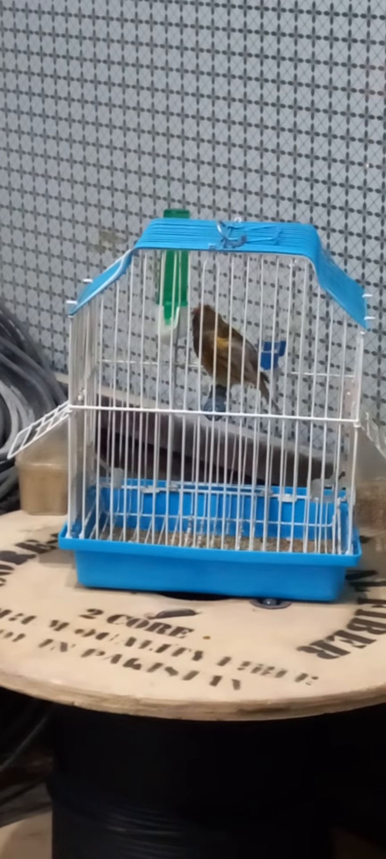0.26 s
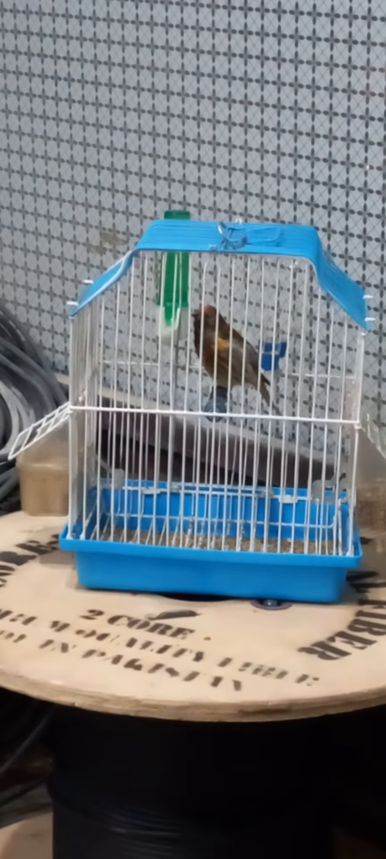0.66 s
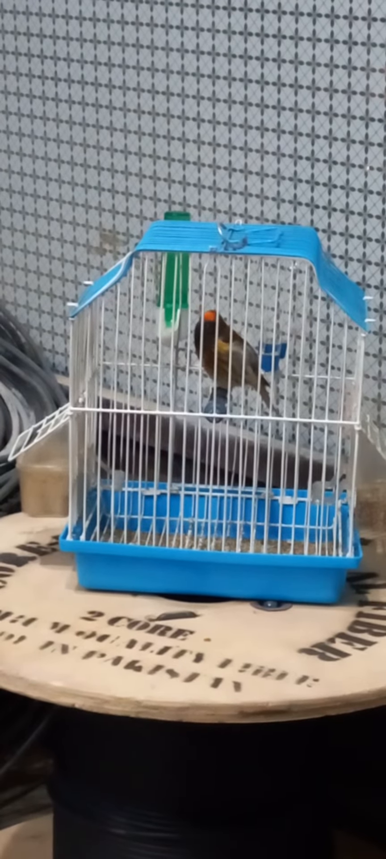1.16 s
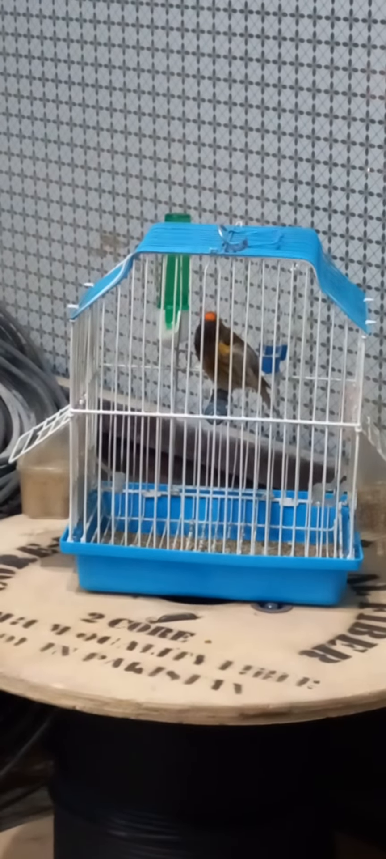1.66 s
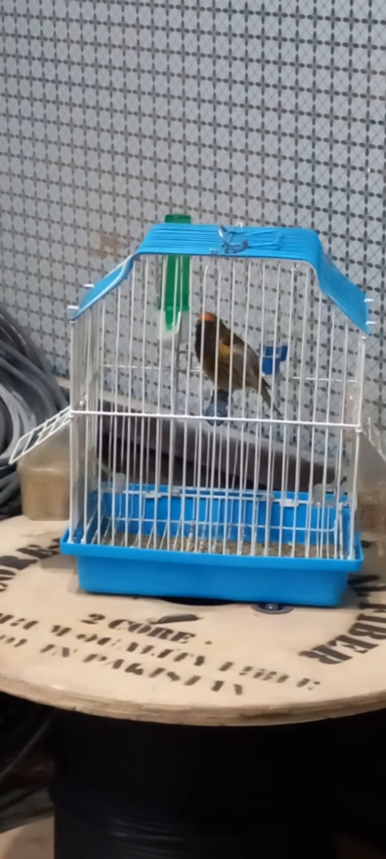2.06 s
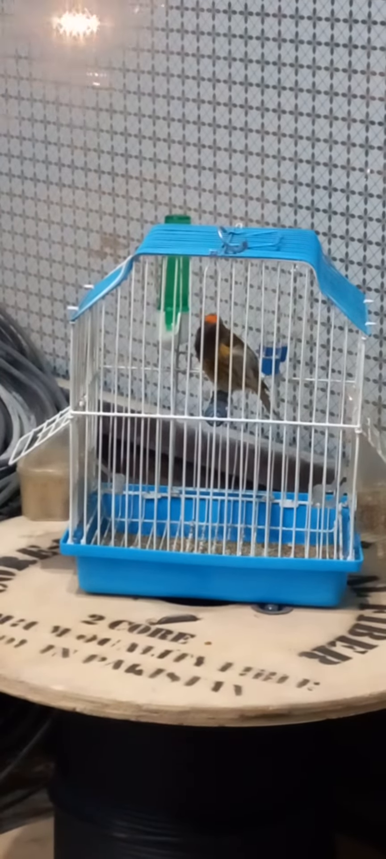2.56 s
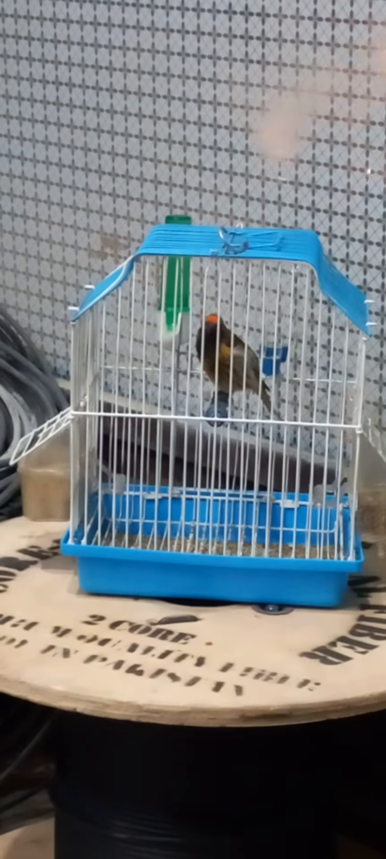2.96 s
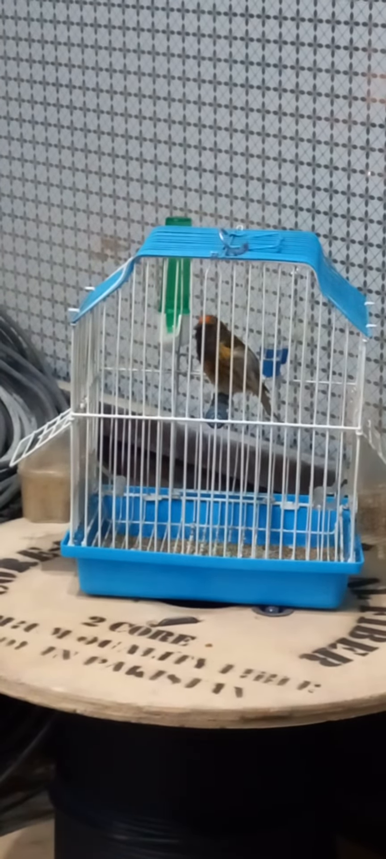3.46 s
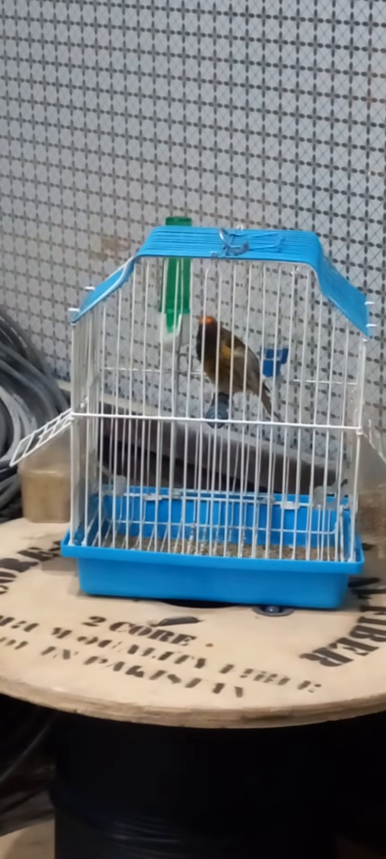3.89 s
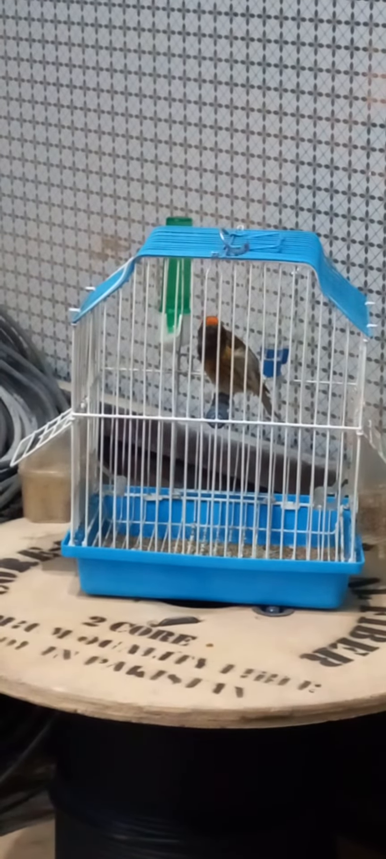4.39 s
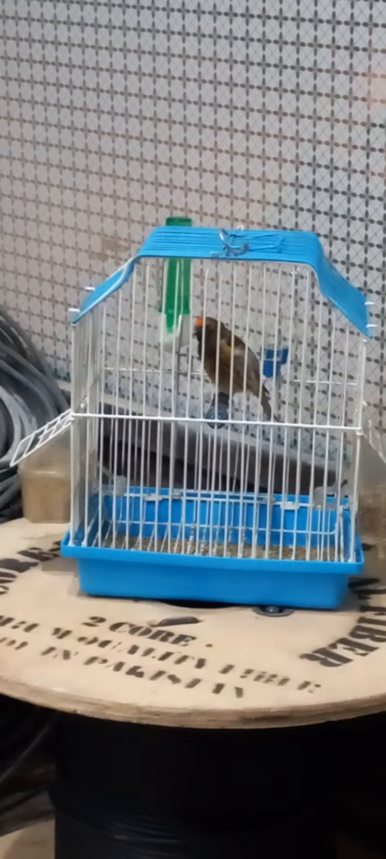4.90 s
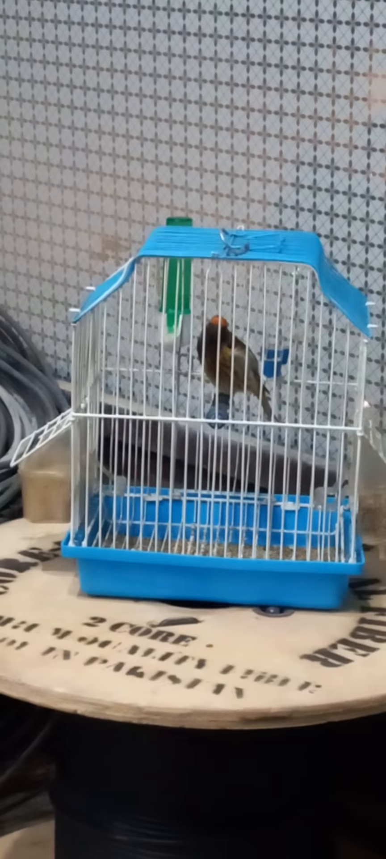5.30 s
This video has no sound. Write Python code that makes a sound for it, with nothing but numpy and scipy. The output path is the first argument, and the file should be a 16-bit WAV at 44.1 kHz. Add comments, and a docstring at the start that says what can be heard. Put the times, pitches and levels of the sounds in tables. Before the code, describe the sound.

A small finch in a wire cage sings close to the microphone in a hard, echoing workshop. Quick high chips, tiny falling flicks and a short rattle come first, then denser twittering with slurs and buzzy rasps, then an even trill near four seconds. The song stops at about four and a half seconds, leaving soft low traffic, light hiss and a few very faint distant chirps.

```python
"""A caged serin in a workshop

A serin twitters in a wire cage in a hard-walled workshop, a metre or two from the microphone.
Its voice organ, the syrinx, has two sides, so its chips often sound as chords of near-sine whistles.
Between them come slurs, flicks, shaky warbles and buzzy pulsed rasps, one rattle and one trill.
Filtered noise and wavering tones make the traffic outside; a few far birds chirp faintly at the end."""
import sys
import numpy as np
from scipy import signal
from scipy.fft import rfft, irfft
from scipy.io import wavfile
from scipy.ndimage import uniform_filter1d

SR = 44100
rng = np.random.default_rng(int(sys.argv[2]) if len(sys.argv) > 2 else 0)


def write(x):
    x = np.atleast_2d(x).T
    wavfile.write(sys.argv[1], SR, np.round(np.clip(x, -1, 1) * 32767).astype(np.int16))


N = 244314
TIME = np.arange(N) / SR   # seconds


def from_db(db):
    """Turn decibels into a gain."""
    return 10 ** (np.asarray(db) / 20)


def rms_one(x):
    """Scale to an rms (average strength) of 1."""
    return x / np.sqrt(np.mean(x ** 2) + 1e-20)


def in_time(rows):
    """Draw each column of a table as a curve over the whole scene."""
    s, *columns = np.transpose(rows)
    return [np.interp(TIME, s, column) for column in columns]


def at_hz(points, hz):
    """Read a spectrum at any pitch, along a log-frequency axis."""
    freqs, values = np.transpose(points)
    return np.interp(np.log(np.maximum(hz, 1)), np.log(freqs), values)


def drift(rate, size):
    """Wander smoothly at random, with this many random points a second and a spread near 1."""
    knots = rng.standard_normal(int(size * rate / SR) + 3)
    return np.interp(np.arange(size) * rate / SR, np.arange(len(knots)), knots)


def add(track, s, sound):
    """Mix a sound into a track from time s."""
    start = max(round(s * SR), 0)
    track[start:start + len(sound)] += sound[:N - start]


# How alike the left and right noise are. Each row: frequency in Hz, correlation (1 = identical).
LEFT_RIGHT_LIKENESS = [(50, 0.91), (130, 0.98), (280, 0.84), (550, 0.24), (1200, 0.027), (16000, 0.09)]


def stereo_noise(spectrum):
    """Make diffuse noise, nearly the same in both channels only in the bass; rms 1."""
    hz = np.arange(N // 2 + 1) * SR / N
    below = spectrum[0][0] / np.maximum(hz, 1)
    above = hz / spectrum[-1][0]
    # beyond the ends of the spectrum the noise falls by 24 dB per octave
    gain = from_db(at_hz(spectrum, hz)) / np.maximum(np.maximum(below, above), 1) ** 4
    alike = np.clip(at_hz(LEFT_RIGHT_LIKENESS, hz), -1, 1)
    mid, side = rfft(rng.standard_normal((2, N))) * gain
    shared = np.sqrt(1 + alike) * mid
    opposed = np.sqrt(1 - alike) * side * [[1], [-1]]
    return rms_one(irfft(shared + opposed, N))


ATTACK_SHARE, RELEASE_SHARE = .3, .12   # shares of a rising note; a falling note is mirrored
CRESCENDO_DB = 3


def syllable(length, pitches, jitter):
    """One puff through the syrinx: pitch curves through three points; rising notes grow, others fade."""
    u = np.linspace(0, 1, max(round(length * SR), 8))
    curve = np.polyfit([0, .5, 1], pitches, 2)
    hz = np.polyval(curve, u) * (1 + jitter * drift(1010, len(u)))
    phase = 2 * np.pi * np.cumsum(hz) / SR
    v = u if pitches[2] >= pitches[0] else 1 - u
    fade = np.clip(np.minimum(v / ATTACK_SHARE, (1 - v) / RELEASE_SHARE), 0, 1)
    swell = np.sin(np.pi / 2 * fade) * from_db(CRESCENDO_DB * v)
    return hz, phase, rms_one(swell)


SCOOP_SHARE = 0.734   # share of the rise done by mid-note, before the arch is added
ARCH_HZ = 54.4   # every scooped note sags this much at both ends


def scoop(hz, rise_hz):
    """Start, middle and end pitch of an arched note that bends early and then levels off."""
    start_hz = hz - SCOOP_SHARE * rise_hz - ARCH_HZ
    end_hz = hz + (1 - SCOOP_SHARE) * rise_hz - ARCH_HZ
    return start_hz, hz, end_hz


def glide(start_hz, end_hz, share):
    """Start, middle and end pitch of a sweep that has covered this share of its way by mid-note."""
    return start_hz, start_hz + share * (end_hz - start_hz), end_hz


# Traffic swells. Each row: time in seconds, then rumble, road roar and tyre hiss in dB before the trims below.
TRAFFIC_SWELLS = [(0.0, -47, -42.5, -77), (0.04, -43, -50, -69), (0.46, -39.5, -43.5, -81),
                  (0.66, -44, -49, -64), (1.19, -37, -45.5, -60.5), (1.71, -45, -47.5, -62),
                  (2.17, -42, -44, -51.5), (2.68, -44, -52.5, -65), (3.52, -50.5, -55.5, -66.5),
                  (4.0, -41, -50.5, -55.5), (4.33, -37.5, -48, -57.5), (4.86, -47, -53.5, -61),
                  (5.51, -48.5, -51.5, -57.5), (5.54, -42, -57, -54)]
RUMBLE_DB, ROAR_DB, TYRES_DB = -3, -2.5, -6.5   # trims
# Tone colour of the rumble. Each row: frequency in Hz, relative strength in dB per Hz.
RUMBLE_SPECTRUM = [(45, -23), (62, 2.5), (80, -3), (120, 6.5), (160, -6.5), (200, -7.5)]
# Tone colour of the road roar. Each row: frequency in Hz, relative strength in dB per Hz.
ROAR_SPECTRUM = [(170, -13.5), (240, 5), (350, -4.5), (440, -9), (650, -15.5), (800, -27.5)]
# Tone colour of the tyre hiss. Each row: frequency in Hz, relative strength in dB per Hz.
TYRE_SPECTRUM = [(600, 7), (850, 0.5), (1300, -8.5)]
# Engine notes that swell and fade, before waver and flutter.
# Each row: start, loudest moment and end in seconds, first and last pitch in Hz, peak level in dB.
ENGINE_NOTES = [(0, .9, 3.0, 67, 63, -48), (.1, 1.1, 1.45, 150, 162, -44), (0, 1.5, 2.45, 332, 366, -51),
                (3.7, 4.3, 4.9, 216, 244, -44), (3.7, 4.35, 5.0, 114, 132, -43)]


def traffic(waver=0.0153, flutter_db=3):
    """Filtered noise is the rumble, roar and hiss through the walls; wavering sines are engines."""
    spectra = (RUMBLE_SPECTRUM, ROAR_SPECTRUM, TYRE_SPECTRUM)
    layers = zip(in_time(TRAFFIC_SWELLS), (RUMBLE_DB, ROAR_DB, TYRES_DB), spectra)
    out = sum(from_db(swell_db + db) * stereo_noise(spectrum) for swell_db, db, spectrum in layers)
    for start, loudest, end, first_hz, last_hz, level_db in ENGINE_NOTES:
        hz = np.interp(TIME, [start, end], [first_hz, last_hz]) * (1 + waver * drift(13, N))
        swell = np.sqrt(np.interp(TIME, [start, loudest, end], [0, 1, 0]))
        level = from_db(level_db + flutter_db * drift(6.8, N))
        out = out + swell * level * np.sin(2 * np.pi * np.cumsum(hz) / SR)
    return out


# Background hiss. Each row: time in seconds, level in dB.
HISS_SWELLS = [(0, -70), (1, -66), (2.1, -59), (3.1, -67), (4.2, -54.5), (5.54, -62)]
# Tone colour of the hiss. Each row: frequency in Hz, relative strength in dB per Hz.
HISS_SPECTRUM = [(900, -12), (1400, -3), (2200, -1.5), (4000, -2.5), (6000, -7.5), (9000, -22.5),
                 (15000, -20.5)]


def background_hiss():
    """Steady-coloured noise whose level slowly comes and goes."""
    return from_db(in_time(HISS_SWELLS)[0]) * stereo_noise(HISS_SPECTRUM)


# How the beak radiates the upper partials of a whistle. Each row: frequency in Hz, gain in dB.
BEAK_GAIN = [(4000, -1), (7000, -2), (10000, 3.5), (12500, 2.5), (14000, 2.5), (16000, 0)]
OVERTONE_GROWTH = 1.2   # overtones swell more steeply than the note itself


def whistles(notes, second_db, fourth_db, coupling, sum_tone_db):
    """Near-sines with overtones; two sides sounding at once beat and make combination tones."""
    tones, overtones = np.zeros(N, complex), np.zeros(N)
    for s, length, pitches, level_db, third_db in notes:
        hz, phase, swell = syllable(length, pitches, jitter=.004)
        add(tones, s, from_db(level_db) * swell * np.exp(1j * phase))
        bright = from_db(level_db + third_db) * rms_one(swell ** OVERTONE_GROWTH)
        # second and fourth partials are set relative to the third
        for k, db in zip(range(2, 5), (second_db, 0, fourth_db)):
            gain = from_db(db + at_hz(BEAK_GAIN, k * hz))
            add(overtones, s, bright * gain * np.sin(k * phase) * (k * hz < SR / 2))
    # the beat stays near zero while one side holds a note alone
    size = uniform_filter1d(np.abs(tones), size=130) + 1e-7
    beat = np.abs(tones) / size - 1
    turn = tones / (np.abs(tones) + 1e-7)
    sum_tones = from_db(sum_tone_db) * beat * (tones * (turn + turn ** 2)).imag
    return tones.imag * (1 + coupling * beat) + overtones + sum_tones


# In the song tables below, levels are in dB before the song's overall trim in scene().
# Third partial levels are in dB against their note, before the beak's gain.

# Chords, both sides at once. Each row: start in seconds, length in seconds, upper mid-note pitch in Hz,
# its rise in Hz, lower pitch in Hz, upper level in dB, lower level in dB, third partial in dB.
CHORD_NOTES = [(0, 0.0067, 5340, 798, 3550, -38.5, -51, -17),
               (0.321, 0.036, 4116, 368, 3370, -37.5, -49, -22),
               (0.398, 0.02, 4317, 53, 3767, -42.5, -46.5, -23),
               (0.597, 0.017, 4670, -300, 3930, -47, -46.5, -20),
               (0.654, 0.02, 5130, 356, 4033, -32.5, -39, -23),
               (1.021, 0.025, 5245, 617, 4067, -31, -35, -26),
               (1.156, 0.027, 4623, 42, 3670, -34, -44, -30),
               (1.207, 0.02, 5310, 159, 3460, -36.5, -44.5, -18),
               (1.501, 0.015, 5030, 700, 2907, -30, -42, -23),
               (2.11, 0.022, 4450, 81, 3496, -30.5, -38, -25),
               (2.16, 0.019, 6830, 30, 5560, -36.5, -43, -8),
               (2.532, 0.0293, 5340, 303, 2830, -37.5, -44, -32),
               (2.708, 0.021, 5527, 622, 3067, -31, -43, -14),
               (2.876, .021, 4970, 393, 3660, -27, -50.5, -22),
               (2.933, 0.021, 5317, 854, 3727, -27.5, -36, -24.5),
               (3.149, 0.021, 4997, 170, 3850, -33.5, -40, -56),
               (3.206, 0.019, 5370, 705, 3874, -34, -39, -16),
               (3.88, 0.043, 4696, 372, 3570, -34, -50.5, -16.5)]
LOWER_RISE_SHARE = 0.39   # the lower voice bends less


def chords():
    """Both sides of the syrinx sing together, each at its own pitch."""
    notes = []
    for s, length, upper, rise, lower, upper_db, lower_db, third in CHORD_NOTES:
        notes.append((s, length, scoop(upper, rise), upper_db, third))
        notes.append((s, length, scoop(lower, LOWER_RISE_SHARE * rise), lower_db, third))
    return notes


def husk(voice, level_db):
    """Turbulence in the syrinx: a thin, bright fizz that follows the loudness of the notes."""
    loudness = np.sqrt(np.abs(uniform_filter1d(voice ** 2, size=90)))
    # frequency in Hz, relative strength in dB
    spectrum = [(2500, 9.9), (5300, 18.0), (7500, 9.1), (9500, 2.0), (13000, 9.7), (16000, 1.7)]
    return from_db(level_db) * loudness * stereo_noise(spectrum)[0]


# Chips from one side. Each row: start in seconds, length in seconds, mid-note pitch in Hz, rise in Hz,
# level in dB, third partial in dB.
CHIP_NOTES = [(0.023, 0.02, 4564, 416, -35.5, -19), (0.206, 0.027, 3534, -200, -47.5, -27),
              (1.479, 0.029, 4750, 200, -32, -20), (1.518, 0.024, 4686, -81, -32, -28),
              (1.512, 0.017, 2340, 36, -51, -28), (1.551, 0.038, 3517, 82, -44.5, -15),
              (1.603, 0.016, 5006, 904, -31, -8.5), (1.686, 0.024, 3970, 324, -42.5, -21),
              (2.178, 0.0093, 4724, 1250, -25.5, -25), (2.368, 0.023, 3654, -150, -30, -30),
              (2.364, 0.0092, 4260, -400, -37, -36), (2.004, 0.018, 4710, 198, -32, -15.5),
              (2.468, 0.0098, 4070, 200, -36, -22), (2.728, 0.013, 4990, -350, -27.5, -26),
              (2.164, 0.015, 2740, 38, -49.5, -30), (3.265, 0.015, 4530, 311, -28.5, -21),
              (3.405, 0.0176, 3986, 650, -29, -24), (3.442, 0.028, 4770, 78, -25.5, -22),
              (3.5, 0.012, 2983, 183, -37.5, -26), (3.654, 0.016, 3700, 302, -35, -29),
              (3.663, 0.024, 4008, 142, -27, -28), (3.716, 0.0187, 6110, 606, -33, -5),
              (3.719, 0.018, 5200, 498, -41, -12), (3.937, 0.022, 2844, 200, -45, -25),
              (3.781, 0.018, 3146, -55, -33.5, -43), (3.805, 0.01, 2920, -100, -40, -35),
              (3.934, 0.013, 7870, 802, -35, -22), (4.328, 0.025, 2854, 158, -46, -34),
              (4.404, 0.022, 5170, 523, -25.5, -22.5), (4.456, 0.016, 5960, 500, -30, -10),
              (4.512, 0.026, 6230, 452, -33.5, -21)]


def chips():
    """One side of the syrinx makes short scooped notes."""
    return [(s, length, scoop(hz, rise), db, third) for s, length, hz, rise, db, third in CHIP_NOTES]


# Flicks. Each row: start in seconds, length in seconds, starting pitch in Hz, level in dB.
FLICK_NOTES = [(0.211, .009, 4570, -52), (0.218, 0.015, 3300, -46), (0.225, 0.015, 2340, -56.5),
               (1.17, 0.009, 4600, -44.5), (1.224, 0.0077, 3650, -43.5), (1.447, 0.013, 3120, -51),
               (1.774, .011, 6390, -33.5), (1.775, .011, 4360, -40.5), (1.774, 0.0088, 2220, -49),
               (1.857, .008, 5900, -33.5), (1.859, 0.0083, 4260, -33.5), (1.867, 0.0091, 2910, -49),
               (2.186, 0.0073, 5290, -26), (2.272, 0.013, 4110, -50), (2.392, 0.016, 3580, -43),
               (2.481, 0.011, 6050, -37), (2.488, 0.013, 3570, -40), (3.1, 0.011, 4320, -50.5),
               (3.108, 0.0084, 2860, -57.5), (3.166, 0.0095, 4810, -44.5), (3.597, 0.012, 5720, -40),
               (3.608, 0.0095, 7710, -35.5), (3.61, 0.011, 3030, -51.5), (3.761, 0.0073, 5950, -28.5),
               (3.765, .01, 4844, -28), (4.31, 0.0097, 5850, -33.5), (4.31, 0.0062, 7700, -40.5),
               (4.473, 0.011, 3420, -39.5)]
FLICK_MIDDLE, FLICK_END = 0.84, 0.528   # pitches as shares of the starting pitch
FLICK_THIRD_DB = -25.5


def flicks():
    """Tiny notes plunge about an octave, ever faster."""
    notes = []
    for s, length, hz, db in FLICK_NOTES:
        notes.append((s, length, (hz, hz * FLICK_MIDDLE, hz * FLICK_END), db, FLICK_THIRD_DB))
    return notes


# Strokes of the rattle. Each row: start in seconds, chip level in dB, plunge level in dB, third partial in dB.
RATTLE_STROKES = [(.716, -31, -31, -20.5), (.776, -38, -33.5, -10.5), (.828, -34, -30, -10.5),
                  (.885, -30, -29.5, -17)]
RATTLE_CHIP_S, RATTLE_HZ, RATTLE_RISE_HZ = .02, 5214, 570
PLUNGE_DELAY_S, PLUNGE_S = .012, .015
PLUNGE_START_HZ, PLUNGE_END_HZ = 5100, 3620   # the end is that of the first stroke
PLUNGE_DEEPEN_HZ = 154   # per stroke
PLUNGE_SHARE = 0.343   # share of a plunge done by mid-note
PIP_DELAY_S, PIP_S, PIP_HZ = .027, .006, 4110
PIP_DB = -3   # against the plunge


def rattle():
    """A chip from one side tips into a plunge from the other, deeper every time, then a low pip."""
    notes = []
    for k, (s, chip_db, plunge_db, third_db) in enumerate(RATTLE_STROKES):
        fall = glide(PLUNGE_START_HZ, PLUNGE_END_HZ - k * PLUNGE_DEEPEN_HZ, PLUNGE_SHARE)
        notes.append((s, RATTLE_CHIP_S, scoop(RATTLE_HZ, RATTLE_RISE_HZ), chip_db, third_db))
        notes.append((s + PLUNGE_DELAY_S, PLUNGE_S, fall, plunge_db, third_db))
        notes.append((s + PIP_DELAY_S, PIP_S, scoop(PIP_HZ, 0), plunge_db + PIP_DB, SLUR_THIRD_DB))
    return notes


# Upward slurs. Each row: start in seconds, length in seconds, start pitch in Hz, end pitch in Hz, level in dB.
SLUR_NOTES = [(1.27, 0.021, 4135, 5010, -29.5), (1.36, 0.027, 4320, 5140, -28),
              (2.337, 0.012, 3040, 3700, -45), (2.356, 0.009, 3580, 5320, -31.5),
              (2.454, 0.018, 3810, 5570, -42), (3.316, 0.023, 3997, 4630, -26.5),
              (3.37, 0.016, 4170, 7800, -34.5), (3.662, 0.0075, 2840, 4020, -39),
              (3.751, .013, 4570, 6000, -32)]
SLUR_SHARE = 0.322   # share of the climb done by mid-note
SLUR_THIRD_DB = -23


def slurs():
    """Notes climb and gather speed."""
    notes = []
    for s, length, start, end, db in SLUR_NOTES:
        notes.append((s, length, glide(start, end, SLUR_SHARE), db, SLUR_THIRD_DB))
    return notes


# Warbles, chips whose pitch shakes fast. Each row: start in seconds, length in seconds, mid-note pitch in Hz
# before the shake, rise in Hz, depth of the shake in Hz, level in dB.
WARBLE_NOTES = [(1.521, 0.018, 2917, 45, 109, -35), (3.528, .02, 4320, 38, 119, -31),
                (4.35, 0.027, 2870, -40, 129, -34.5), (4.468, 0.012, 3840, -300, 300, -33.5),
                (4.499, 0.027, 3868, 205, 225, -28.5)]
WARBLE_RATE_HZ, WARBLE_THIRD_DB = 171.6, -19


def warbles():
    """A fast tremor of the syrinx roughens these notes."""
    out = np.zeros(N)
    for s, length, pitch, rise, depth_hz, level_db in WARBLE_NOTES:
        hz, phase, swell = syllable(length, scoop(pitch, rise), jitter=.012)
        tremor = np.sin(2 * np.pi * WARBLE_RATE_HZ * TIME[:len(hz)])
        shaken = phase + depth_hz / WARBLE_RATE_HZ * tremor
        tone = np.sin(shaken) + from_db(WARBLE_THIRD_DB) * np.sin(3 * shaken)
        add(out, s, from_db(level_db) * swell * tone)
    return out


# Rasps arch like chips; they have a trim of their own in scene().
# Each row: start in seconds, length in seconds, mid-note pulse rate in Hz, rise in Hz, level in dB,
# brightness in dB per octave, top of the beak's passband in Hz, roughness (0 = smooth, about 1 = very rough).
RASP_NOTES = [(1.764, 0.014, 1435, 170, -35, 9.5, 7660, 0.2), (1.846, 0.018, 1385, 260, -33, 5.5, 6500, 0),
              (1.991, 0.036, 1500, 268, -30, 6, 6150, 0.13),
              (2.565, 0.015, 1487, 207, -29, 4.5, 6540, 0.54),
              (3.604, .014, 2368, -300, -33, 7.5, 7950, 0.3),
              (3.715, 0.022, 2279, 200, -32.5, 5.5, 8700, 0.48),
              (3.931, 0.023, 2570, 275, -31, 11, 15900, 1.11),
              (4.189, 0.0046, 1870, 102, -40, -2.5, 14100, 0.6),
              (4.25, 0.0028, 1880, 100, -38, -1.5, 14000, .4),
              (4.304, 0.0079, 1917, 177, -30, -1.5, 12900, 0.23),
              (4.325, 0.019, 1408, 127, -31, 6.5, 6700, 0.17),
              (4.458, 0.013, 1506, 132, -35, 0.5, 12000, 0.37)]
# How throat and beak colour a rasp, before its brightness. Each row: frequency in Hz, gain in dB.
THROAT_GAIN = [(1400, -28), (1950, -11), (2900, -3), (4500, -1), (5900, -3), (7300, -15), (9500, -17),
               (11000, -20), (13500, -21), (16000, -30)]
# What gets past the beak above its passband. Each row: frequency in Hz, gain in dB.
BEAK_LEAK_GAIN = [(8000, -17), (10000, -17), (12500, -1.5), (15500, -7.5)]


def rasps(alternation=0.38):
    """The syrinx pulses at a low rate, unevenly when rough; throat and beak shape the harmonics."""
    out = np.zeros(N)
    for s, length, rate, rise, level_db, tilt_db, top_hz, rough in RASP_NOTES:
        hz, phase, swell = syllable(length, scoop(rate, rise), jitter=.03 * rough)
        stack = 0
        for k in range(1, 13):
            passband = 1 / np.hypot(1, (k * hz / top_hz) ** 8)
            opening = np.maximum(passband, from_db(at_hz(BEAK_LEAK_GAIN, k * hz)))
            colour = from_db(at_hz(THROAT_GAIN, k * hz) + tilt_db * np.log2(k * hz / 5000))
            stack = stack + opening * colour * np.sin(k * phase) * (k * hz < SR / 2)
        # strong and weak pulses by turns, plus chance
        uneven = 1 + rough * (alternation * np.sin(phase / 2) + drift(965, len(hz)))
        add(out, s, from_db(level_db) * swell * uneven * stack)
    return out


# The trill, which starts sharp and settles. Each row: start in seconds, mid-chip pitch in Hz,
# chip level in dB, plunge level in dB.
TRILL_STROKES = [(3.989, 4260, -25, -37.5), (4.043, 4054, -24, -34.5), (4.092, 3993, -23, -32.5),
                 (4.148, 4075, -25, -36), (4.194, 3970, -25, -57), (4.25, 3980, -24, -48)]
TRILL_CHIP_S, TRILL_RISE_HZ, TRILL_THIRD_DB = .021, 154, -18.5
TRILL_ARCH_HZ = 68.5   # extra sag at both ends, on top of the usual arch
TRILL_FALL_DELAY_S, TRILL_FALL_S = .014, .01
TRILL_FALL_START_HZ, TRILL_FALL_END_HZ, TRILL_FALL_THIRD_DB = 8300, 6000, -14


def trill():
    """Arched chips, each with a faint high plunge from the other side."""
    notes = []
    fall = glide(TRILL_FALL_START_HZ, TRILL_FALL_END_HZ, PLUNGE_SHARE)
    for s, hz, chip_db, plunge_db in TRILL_STROKES:
        arch = np.array(scoop(hz, TRILL_RISE_HZ)) - TRILL_ARCH_HZ * np.array([1, 0, 1])
        notes.append((s, TRILL_CHIP_S, arch, chip_db, TRILL_THIRD_DB))
        notes.append((s + TRILL_FALL_DELAY_S, TRILL_FALL_S, fall, plunge_db, TRILL_FALL_THIRD_DB))
    return notes


# Far birds, before the room. Each row: start in seconds, length in seconds, mid-note pitch in Hz,
# rise in Hz, level in dB.
FAR_BIRD_NOTES = [(4.752, .05, 3520, 250, -60), (4.748, .04, 3280, 60, -65), (4.865, .04, 3440, 80, -66),
                  (5.015, .035, 7150, 500, -69), (5.135, .035, 6050, 80, -66), (5.222, .03, 5990, 120, -62),
                  (5.344, .025, 4680, 250, -63), (5.39, .044, 3960, 150, -65), (5.43, .055, 4700, 300, -65),
                  (5.495, .025, 5110, 120, -65)]


def far_birds():
    """Thin, plain chirps: one sine each."""
    out = np.zeros(N)
    for s, length, pitch, rise, level_db in FAR_BIRD_NOTES:
        hz, phase, swell = syllable(length, scoop(pitch, rise), jitter=0.026)
        add(out, s, from_db(level_db) * swell * np.sin(phase))
    return out


def direct(x, pan_db=-2.5):
    """The straight path reaches the left channel a little sooner and the right a little louder."""
    lead_s = .000055
    finer = signal.resample_poly(x, 4, 1)   # finer steps allow a shift of a few samples' fraction
    left = np.interp(TIME + lead_s, np.arange(4 * N) / (4 * SR), finer)
    return np.array([left * from_db(pan_db), x * from_db(-pan_db)])


# Echoes off the cage tray, the table and the near wall.
# Each row: delay on the left in seconds, delay on the right in seconds, level in dB.
NEAR_ECHOES = [(.00186, .00192, -10), (.0047, .00445, -12), (.0056, .0072, -13), (.0092, .01, -13),
               (.0164, .018, -16)]


def echoes(x):
    """Hard surfaces near the bird repeat each sweep crisply."""
    out = np.zeros((2, N))
    for left_s, right_s, level_db in NEAR_ECHOES:
        add(out[0], left_s, from_db(level_db) * x)
        add(out[1], right_s, from_db(level_db) * x)
    return out


# How long the room rings. Each row: frequency in Hz, time to fall by 60 dB in seconds.
ROOM_RING = [(1500, 0.37), (3000, 0.33), (5000, 0.37), (8000, 0.38), (15000, 0.22)]
# How the room colours its reflections. Each row: frequency in Hz, gain in dB.
ROOM_GAIN = [(1500, 5.5), (4000, 3.5), (8000, 1), (15000, 3)]
EARLY_T60_S = .04   # the early cluster falls by 60 dB in this time


def workshop(x, early_db=-9.5, late_db=1.46, gap_s=0.0012):
    """Dense reflections: a quick cluster from cage and table, then a tail whose top treble dies first."""
    t = TIME[:SR * 3 // 4]
    hz = np.arange(len(t) // 2 + 1) * SR / len(t)
    white = rfft(rng.standard_normal((2, len(t))))   # different at each ear
    edges = np.geomspace(1000, 18000, 11)
    opening = np.clip(t / gap_s - 1, 0, 1)   # silent for one gap, full after two
    response = 0
    for low, high in zip(edges, edges[1:]):
        centre = np.sqrt(low * high)
        early = from_db(early_db) * rms_one(opening * from_db(-60 * t / EARLY_T60_S))
        late = from_db(late_db) * rms_one(opening * from_db(-60 * t / at_hz(ROOM_RING, centre)))
        band = irfft(white * ((hz >= low) & (hz < high)), len(t))
        response = response + band * np.hypot(early, late) * from_db(at_hz(ROOM_GAIN, centre))
    return signal.fftconvolve(x[None], response / np.sqrt(len(t)), axes=1)[:, :N]


# rattle and trill are aimed at the microphone and stir the room less
RUN_ROOM_DB = -5.5


def scene(song_db=-2.0, rasp_db=-1.0):
    """Lay the song and its room over the background; far birds are heard only through the room."""
    background = traffic() + background_hiss()
    single_notes = chips() + slurs() + flicks()
    clear = whistles(single_notes + chords(), second_db=-8.0, fourth_db=0, coupling=0.33, sum_tone_db=-13.0)
    clear = clear + warbles()
    rattled = whistles(rattle(), second_db=5.5, fourth_db=-7, coupling=0.4, sum_tone_db=-24)
    trilled = whistles(trill(), second_db=-10, fourth_db=-1, coupling=0.18, sum_tone_db=-16)
    buzzy = from_db(rasp_db) * rasps()
    fizz = husk(clear + trilled, level_db=-25) + husk(buzzy, level_db=-21)
    song = from_db(song_db) * (clear + buzzy + fizz)
    runs = from_db(song_db) * (trilled + rattled)
    into_room = song + from_db(RUN_ROOM_DB) * runs + far_birds()
    return direct(song + runs) + echoes(into_room) + workshop(into_room) + background


CUTOFF_HZ = 15900


def record(dry):
    """Cut the top of the treble steeply."""
    steep_filter = signal.ellip(12, .1, 80, CUTOFF_HZ, fs=SR, output="sos")
    return signal.sosfilt(steep_filter, dry)


dry = scene()
out = record(dry)
write(out)
```